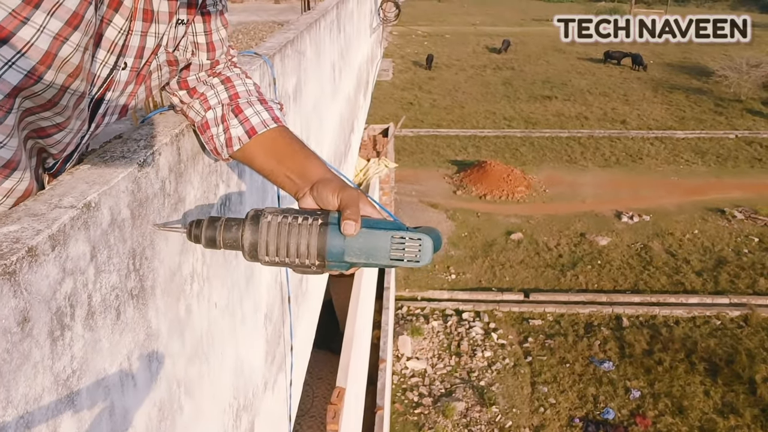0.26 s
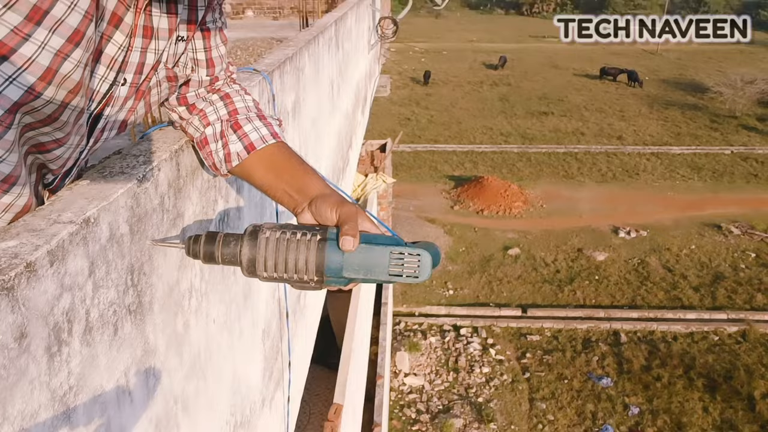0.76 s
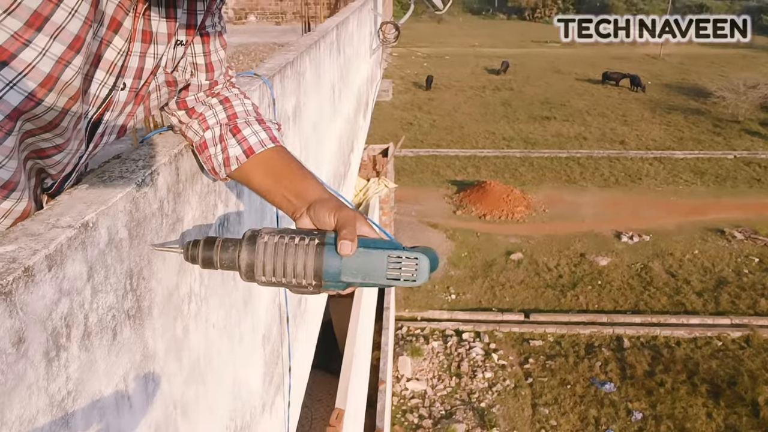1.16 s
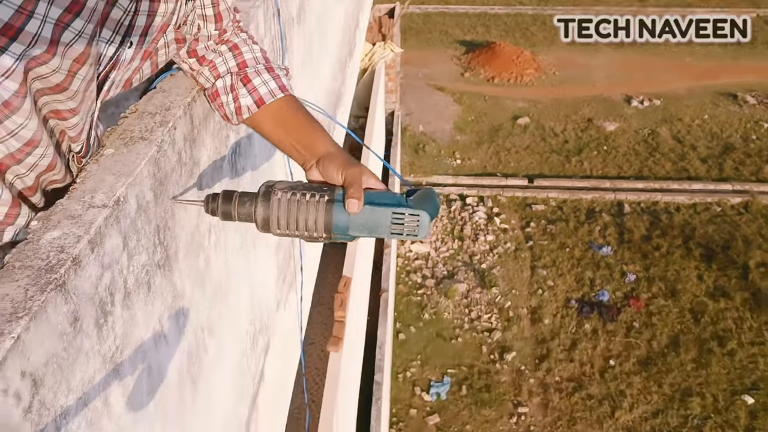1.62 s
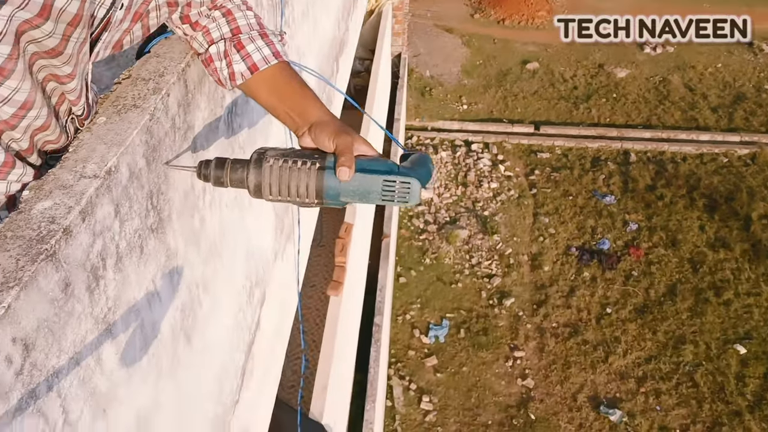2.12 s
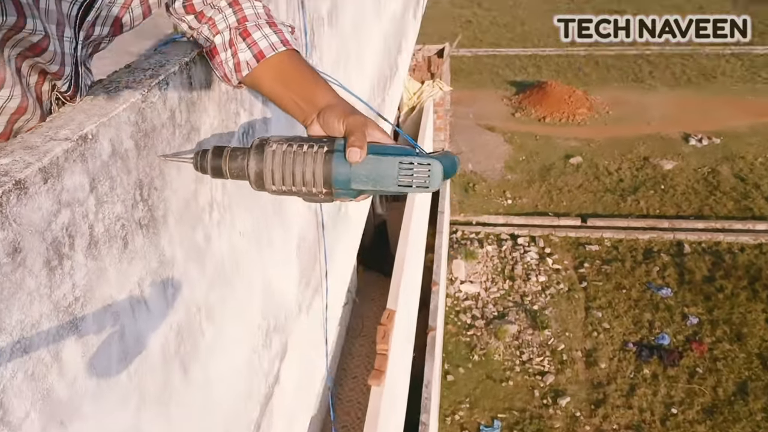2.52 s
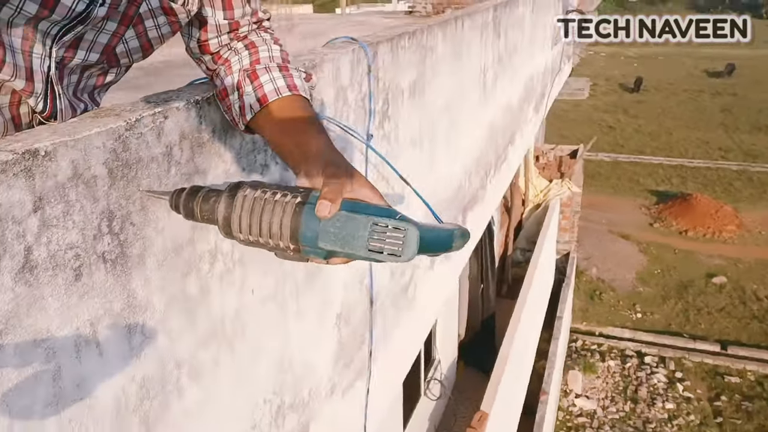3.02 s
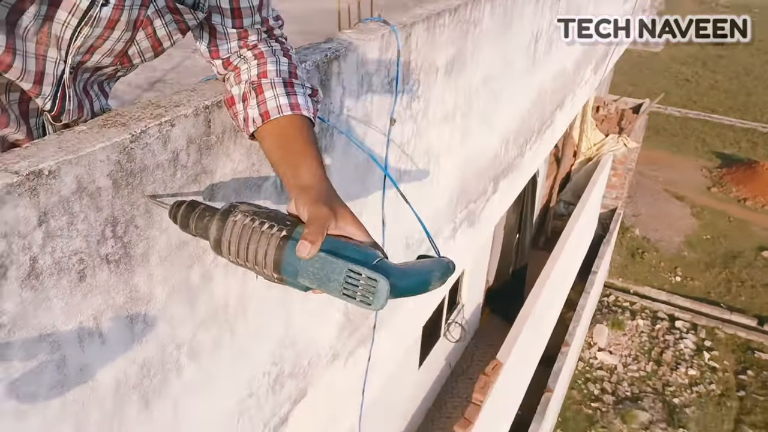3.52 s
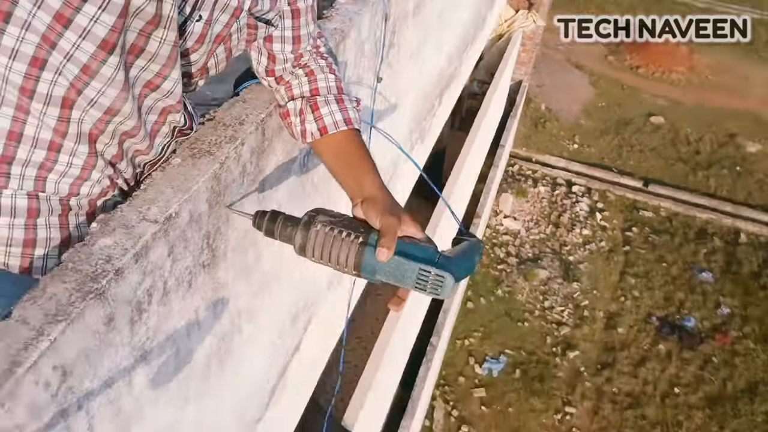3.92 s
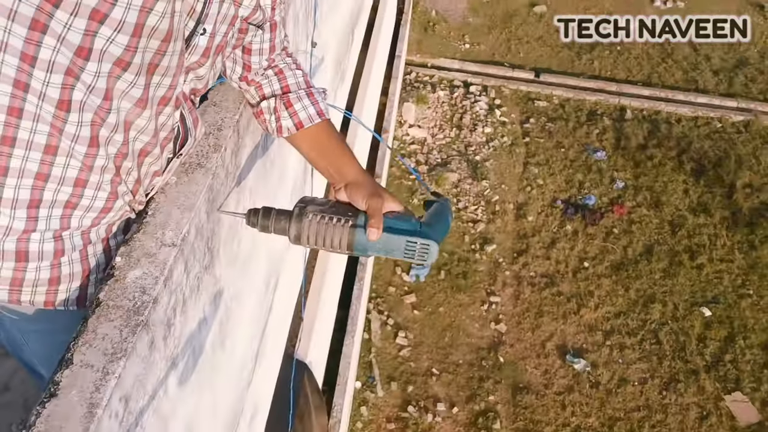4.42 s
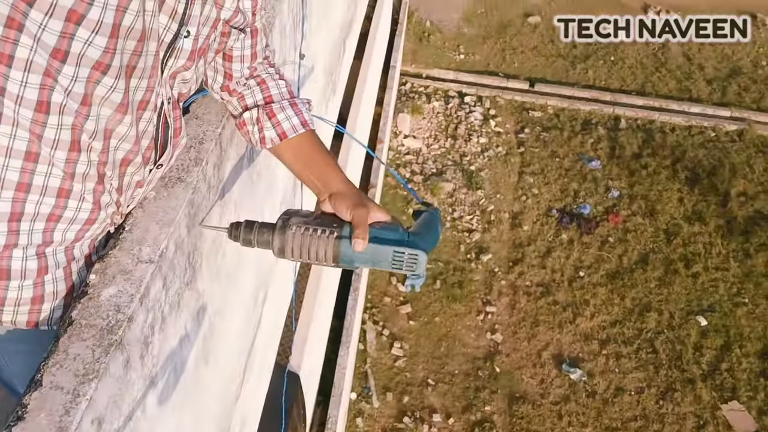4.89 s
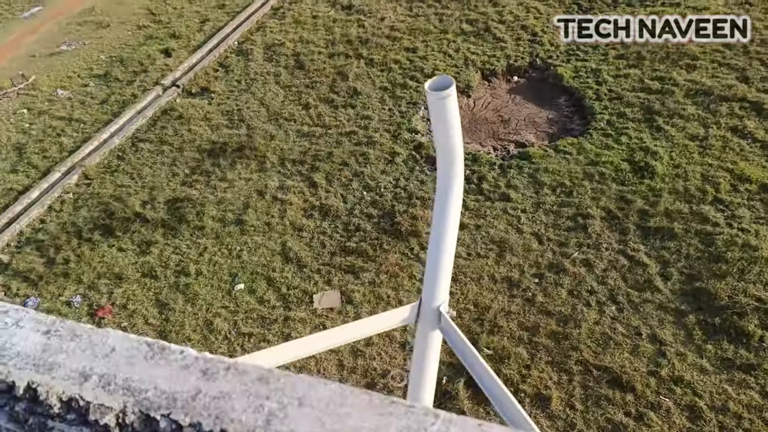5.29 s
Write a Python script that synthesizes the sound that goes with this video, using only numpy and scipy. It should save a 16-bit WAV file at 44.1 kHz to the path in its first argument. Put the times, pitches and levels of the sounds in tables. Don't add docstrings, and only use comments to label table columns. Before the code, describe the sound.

Rapid metallic hammering from a power drill drops from quick to laboured pace outdoors, then stops dead, leaving faint wind and small handling clicks.

```python
import sys
import numpy as np
from scipy import signal
from scipy.fft import rfft, irfft
from scipy.io import wavfile
from scipy.ndimage import uniform_filter1d

SR = 44100
rng = np.random.default_rng(int(sys.argv[2]) if len(sys.argv) > 2 else 0)


def volts(x):
    e = np.asarray(x, float) / 20
    return 10 ** e


def int16_out(signal):
    q = np.round(np.clip(np.atleast_2d(signal).T, -1, 1) * 32767)
    wavfile.write(sys.argv[1], SR, q.astype(np.int16))


N = 244755
TIME = np.arange(N) / SR

# start in seconds, level in dB.
AIR_LEVEL = [
    (5.315, -85),
    (5.335, -56),
    (5.4, -47.5),
    (5.47, -41.5),
    (5.55, -40),
]
# frequency in Hz, density in dB per Hz.
AIR_COLOUR = [(180, -35), (300, -16), (593, -30), (701, -17), (961, -41.5), (1040, -35.5), (3520, -42.5),
              (5080, -50.5), (10300, -55), (11500, -85)]
# start in seconds, left dB, right dB, fall in ms.
CASE_TICKS = [
    (5.376, -40, -40, 2.1),
    (5.481, -34, -32, 1.4),
    (5.4968, -16, -45, 0.27),
    (5.5022, -42, -8.5, .3),
    (5.549, -38, -25, 0.35),
]

# frequency in Hz, density in dB per Hz.
WIND_COLOUR = [(15, -6.5), (40, -3.5), (80, -4), (118, 1.5), (170, -6), (300, -19), (600, -36), (1500, -58),
               (4000, -76)]
# peak time in seconds, peak level in dB, seconds to fall 10 dB.
LEFT_GUSTS = [(0, -30, .3), (.62, -30.5, .12), (.78, -28, .06), (.94, -24, .05), (1.04, -25, .03),
              (1.14, -28, .05), (2.12, -32, .1), (2.25, -27, .05), (2.48, -29.5, .08), (2.63, -29, .12),
              (3.01, -30, .12), (3.12, -25, .12), (3.51, -18, .08), (3.64, -24, .08), (3.85, -27, .1),
              (4.05, -27, .2), (4.23, -28, .12), (4.4, -28, .1), (4.55, -33, .1), (4.69, -29, .08),
              (5.0, -35, .2)]
# peak time in seconds, peak level in dB, seconds to fall 10 dB.
RIGHT_GUSTS = [(0, -28, .4), (.62, -28, .25), (.88, -24.5, .08), (.99, -25, .07), (1.12, -24, .08),
               (1.285, -19, .07), (1.79, -27, .11), (2.04, -30, .12), (2.19, -24, .1), (2.31, -17, .1),
               (2.46, -19, .12), (2.64, -16.5, .16), (2.78, -19, .12), (2.87, -15.5, .1), (3.05, -19.5, .1),
               (3.35, -15.5, .14), (3.57, -19, .07), (3.64, -14.5, .03), (3.75, -24, .03),
               (3.97, -16.5, .06), (4.08, -21, .1), (4.19, -14.5, .07), (4.31, -17, .06), (4.48, -28, .15),
               (4.62, -28, .15), (4.76, -31, .15), (4.96, -27, .09), (5.15, -31, .1)]
# peak time in seconds, peak level in dB, seconds to fall 10 dB.
LATE_GUSTS = [
    [(5.335, -32, .012), (5.417, -28, .014), (5.49, -25, .015), (5.53, -28, .03)],
    [(5.488, -20, .015), (5.512, -21, .02), (5.545, -20, .02)],
]
# start in seconds, left peak, right peak (full scale 1), length in ms.
PORT_POPS = [(.008, -0.26, 0.03, 20), (0.033, -0.048, -.3, 28), (.175, 0.24, .15, 23),
             (0.198, -0.23, 0.19, 18), (0.222, 0.075, -.1, 18), (0.348, .35, -0.039, 27),
             (.547, -0.3, .35, 30), (.573, 0.67, -0.47, 39), (0.804, 0, -.32, 35),
             (1.119, -0.54, 0.035, 19), (1.347, 0.16, 0.068, 15), (2.941, 0.087, 0.49, 20),
             (3.042, 0, -0.56, 30), (3.107, -0.027, 0.6, 28), (3.74, -0.036, -0.43, 28),
             (3.807, 0.049, 0.56, 22)]
# centre in seconds, left peak, right peak (full scale 1), pitch in Hz, length in ms.
PORT_BUFFETS = [(5.334, .06, 0, 165, 5), (5.337, .02, 0, 400, 4), (5.359, .018, 0, 300, 5),
                (5.38, .025, .008, 170, 9), (5.412, -.12, 0, 135, 8), (5.426, .17, 0, 170, 4),
                (5.447, .025, .008, 350, 8), (5.488, .05, .16, 150, 6), (5.509, 0, .19, 125, 7),
                (5.527, .04, .12, 100, 8), (5.5435, .02, .36, 75, 6)]

# time in seconds, piston turns per second.
SPEED = [(0.0, 42.667), (0.35, 40.089), (0.6, 39.03), (1.08, 37.898), (1.25, 35.186), (1.4, 33.157),
         (1.6, 31.812), (1.78, 30.795), (2.0, 30.371), (2.4, 30.189), (2.78, 29.871), (3.1, 29.829),
         (3.4, 29.977), (3.6, 30.265), (3.8, 30.267), (4.0, 30.394), (4.4, 30.534), (5.55, 30.843)]
# time in seconds, nearness in dB, vents facing the phone in dB, chuck ring in dB.
STANCE = [(0, 1.5, -.5, 0), (.3, 0, .5, 0), (.55, -.3, .5, -.5), (.8, .5, 0, .5), (1.06, .7, 0, .5),
          (1.39, -2, .5, -1), (1.61, -3.5, .5, -.5), (2.2, -2.5, .5, 1.5), (2.78, 0, 0, .5),
          (3.05, -1, 0.5, 0), (3.4, -.5, 3.5, -1.5), (3.75, -1, 2.5, -1.5), (3.96, -2.5, 1.5, 4),
          (4.3, -3, .5, 4.2), (4.69, -2, 1, 4.5), (5.22, -1.5, 1.2, 4)]
# time in seconds, lag in samples.
PORT_LAG = [
    (0, 8),
    (1.5, 6),
    (3, 1),
    (5.3, 2),
]
# frequency in Hz, left minus right in dB.
PORT_DIFFERENCE = [(300, 0.5), (800, 0), (1300, -6), (2300, -17), (3500, 0), (4400, -0.5), (5900, -9),
                   (7200, -15), (8600, 14), (11000, 3.5), (13000, 0.5), (15500, -3.5)]
# frequency in Hz, density in dB per Hz.
DRILL_COLOUR = [(120, -29.5), (200, -8.5), (320, -13.5), (600, -12.5), (930, -9.5), (1700, -4), (2500, 0.5),
                (3200, -3), (3700, -8), (6500, -6.5), (7400, -7.5), (8800, -19), (13300, -17), (15600, -16)]
# frequency in Hz, width in Hz, height in dB.
DRILL_RINGS = [(246.4, 25, 3.5), (433, 150, 7.5), (725, 70, 7.5), (1265, 60, 2.5), (1680, 200, 2),
               (2605, 330, 1.5), (2880, 130, 4), (3080, 160, 5), (3890, 310, -1), (13150, 760, 2)]
# frequency in Hz, width in Hz, dB per dB of chuck ring.
LEANING = [
    (2480, 420, 1.3),
    (3000, 600, -1.5),
    (1280, 140, 1.2),
    (1700, 250, -.3),
]

# low Hz, high Hz, grind between knocks in dB, repeat per turn (0-1),
# scatter in dB, share common to both ports (0-1), trim in dB.
LAYERS = [
    (91.5, 890, -12, .72, 1.5, .84, -1.3),
    (876, 1367, -11.5, 0.6, 2, 0.5, -5.5),
    (1410, 3900, -9, 0.6, .6, 0.4, -1.6),
    (3318, 6320, -5, 0.3, 1.0, 0.36, 0.4),
    (8000, 11240, -9.5, 0.1, 2, 0.05, -3),
    (11330, 15000, -18.5, 0.3, 2.4, 0.28, -2),
]
LAYER_PART = (0, 0, 1, 2, 3, 3)
# level in dB, then dB per dB of nearness, of facing and of chuck ring.
PARTS = [
    (-31.3, .9, -.1, -.05),
    (-25.5, .6, -.4, .3),
    (-28, .8, 1.05, -.05),
    (-34.7, 1.3, .2, -.05),
]
# share of the turn, rise in ms, fall in ms, wall dB, chuck dB, gears dB, bit dB.
KNOCKS = [
    (0.0, 1.15, .7, -5, -10, -2.5, -6.5),
    (.032, 0.95, 1.4, -6, -9, 1.5, 2),
    (.29, 2.1, 2.4, -1, -6.5, 1, -13),
    (.45, 0.32, 0.68, -8.5, -14, -8, -22),
    (.6, 1.5, 1.0, -18, -10, -7.5, -18.5),
    (.76, 1.6, 1.3, -11, -1.5, -7, -18),
    (.86, 0.5, 0.4, -12, -4, 1.5, -18),
]
# wall dB, chuck dB, gears dB, bit dB.
LOADED_KNOCKS = [(-2, -1.5, -.5, .1), (-2, -1.5, .1, .1), (-.6, .1, .6, 5), (.1, .1, .1, .1),
                 (.1, .1, .1, 3), (-.6, -4, .1, 3), (.1, -.5, -4, .1)]
LOADED_SHIFT = (0, -.043, -.06, -.03, -.035, 0.01, -.165)
LOADED_GRIND_DB = (.1, .1, .1, .1, 2.2, 2.2)
GRIND_SWAY_DB = (.1, .1, .1, .1, 1.2, 2.2)
# time in seconds, lower bit dB, upper bit dB.
STRIKES = [(0.009, 6, 0), (0.176, 4, -4), (0.273, 4, -4), (0.398, 5, 2), (0.652, -1, -7), (0.729, 1, 8),
           (0.755, 7, 0), (0.833, 5, -1), (0.859, -3, 6), (0.937, 1, 6), (0.963, 0, 4), (0.989, 7, 2),
           (1.121, 8, 0), (1.148, 2, 4), (1.203, 2, 4), (1.26, -4, -7), (1.318, -6, -6), (1.347, 2, 5),
           (1.377, 0, 6), (1.498, 2, 9), (1.56, -1, -8), (1.654, 1, 6), (1.783, 5, 1), (1.848, -8, -4),
           (1.881, -2, -8), (1.946, 2, 8), (2.111, 4, 1), (2.177, 4, 4), (2.243, 2, 5), (2.441, 0, 9),
           (2.475, 5, -1), (2.574, 1, 7), (2.708, 7, 4), (2.741, 2, 6), (2.875, 3, 7), (2.942, -7, -2),
           (2.975, -4, -6), (3.043, 6, -5), (3.11, 4, -3), (3.177, 11, 4), (3.21, -5, 5), (3.344, 6, -4),
           (3.41, -6, -6), (3.477, -4, 8), (3.543, 0, 4), (3.577, 9, 10), (3.61, 4, -1), (3.808, 7, 5),
           (3.874, -3, 6), (3.907, 5, 10), (4.006, 5, 5), (4.17, -4, -6), (4.203, -5, -6), (4.236, -6, -10),
           (4.334, 2, 4), (4.367, 0, 7), (4.563, -8, -14), (4.596, 5, 5), (4.629, -5, 8), (5.053, 4, 8)]
STRIKE_REACH = (0, 0, .05, .25, 1.25, 1.25)
# time in seconds, barrel Hz, barrel length in ms, barrel dB,
# chuck dB, casing dB, return stroke dB.
BLOWS = [
    (0, 1900, .65, -8.5, -10, -10, -27),
    (1.1, 1900, .65, -8.5, -10.5, -10.5, -25),
    (1.4, 1900, .6, -9, -14, -11, -20),
    (1.65, 2100, .8, -10.5, -24, -11.5, -17),
    (2.2, 2100, .8, -10, -24, -11.5, -16.5),
    (2.45, 1850, .8, -12.5, -26, -16, -16),
    (3.0, 1850, .8, -13, -26, -17, -16),
    (3.25, 2000, .8, -13.5, -30, -17, -19),
    (3.8, 2000, .8, -13.5, -30, -17, -18),
    (3.95, 2230, 1.0, -10.5, -30, -27, -15.5),
    (5.25, 2230, 1.0, -12, -30, -26, -15),
]
# share of the turn, delay free in ms, delay loaded in ms, length in ms (0: barrel's own).
BLOW_TIMES = [
    (0, -.3, -.5, .9),
    (0, -.3, -.55, 0),
    (0, -.3, -.1, .6),
    (0, .43, .05, 1.0),
    (.25, 0, 0, 1.3),
    (.745, 0, 0, 1.7),
]

LOADED_TURNS_PER_S, FREE_TURNS_PER_S = 30, 39


def unit(x):
    return x / np.sqrt(np.mean(x ** 2, axis=-1, keepdims=True))


def curves(table, outside_db=None):
    s, *columns = np.transpose(table)
    return np.array([np.interp(TIME, s, c, outside_db, outside_db) for c in columns])


def spectrum_at(hz, points):
    corner_hz, corner_db = np.transpose(points)
    return np.interp(np.log(hz), np.log(corner_hz), corner_db)


def shape(points, rings=()):
    hz = np.arange(4097) * SR / 8192 + 1
    bells_db = sum(db / (1 + (2 * (hz - ring_hz) / width_hz) ** 2) for ring_hz, width_hz, db in rings)
    return np.atleast_2d(spectrum_at(hz, points) + bells_db)


def colour(x, db):
    fold = np.r_[1, 2 * np.ones(4095), np.zeros(4096)]
    cepstrum = irfft(db * np.log(10) / 20)
    response = irfft(np.exp(rfft(fold * cepstrum)))
    return signal.fftconvolve(x, response, axes=-1)[:, :N]


def filtered(x, order, hz, kind):
    return signal.sosfilt(signal.butter(order, hz, kind, fs=SR, output="sos"), x)


def walk(rate, count):
    k = int(SR / rate)
    held = np.repeat(rng.standard_normal((count, N // 200)), k, axis=1)[:, :N]
    return 1.4 * uniform_filter1d(uniform_filter1d(held, k), k)


def open_air():
    mid, side = unit(colour(rng.standard_normal((2, N)), shape(AIR_COLOUR)))
    out = volts(curves(AIR_LEVEL, outside_db=-120)) * np.array([mid + 0.63 * side, mid - .8 * side])
    rustle = filtered(rng.standard_normal((2, N)), 2, [300, 5000], "band")
    for s, left_db, right_db, fall_ms in CASE_TICKS:
        ms = (TIME - s) * 1000
        brush = .4 * rustle * (ms > 0) * np.exp(-np.abs(ms) / fall_ms)
        snap = np.exp(-(ms / 0.07) ** 2)
        out += volts([[left_db], [right_db]]) * (brush - snap)
    return out


def gusts(ports, breeze_db):
    gust_db = []
    for rows in ports:
        each_db = [peak_db - 10 * np.abs(TIME - s) / fall_s for s, peak_db, fall_s in rows]
        gust_db.append(np.max(each_db, axis=0))
    return np.hypot(volts(breeze_db), volts(gust_db))


def wind(level, flutter_db=1.5):
    rumble = unit(colour(rng.standard_normal((2, N)), shape(WIND_COLOUR)))
    return rumble * level * volts(flutter_db * walk(30, count=2))


def late_wind():
    breeze_db = curves(AIR_LEVEL, outside_db=-120)[0] + 0.1
    opening = np.clip((TIME - AIR_LEVEL[0][0]) / .015, 0, 1)
    level = gusts(LATE_GUSTS, breeze_db) * opening
    return filtered(wind(level, flutter_db=1.0), 2, 70, "high")


def buffets():
    out = np.zeros((2, N))
    for s, left, right, hz, length_ms in PORT_BUFFETS:
        puff = np.exp(-((TIME - s) * 1000 / length_ms) ** 2)
        out += np.outer([left, right], puff * np.cos(2 * np.pi * hz * (TIME - s)))
    return out


def pops():
    out = np.zeros((2, N))
    for s, left, right, length_ms in PORT_POPS:
        x = np.clip(TIME - s, 0, None) * 1000 / (0.59 * length_ms)
        out += np.outer([left, right], (x > 0) * np.cos(2 * np.pi * x ** 0.7) * np.exp(-1.3 * x))
    return filtered(1.18 * out, 2, 750, "low")


def piston():
    rate = curves(SPEED)[0]
    lead = .1
    done = .636 + np.cumsum(rate) / SR + lead
    return done.astype(int), (done % 1 - lead) / rate * 1000, rate


def stance(rate):
    near_db, facing_db, ring_db = curves(STANCE)
    free = rate - LOADED_TURNS_PER_S
    parts_db = [db + a * near_db + b * facing_db + c * ring_db for db, a, b, c in PARTS]
    parts_db[1] = parts_db[1] + .1 * free
    pan_db = -.8 + 3 * np.exp(-((TIME - 3.08) / .2) ** 2)
    rebound_db = -.5 + .15 * ring_db - .1 * free
    return parts_db, pan_db, rebound_db, ring_db


def strikes(turn):
    s, lower_db, upper_db = np.transpose(STRIKES)
    listed = turn[(s * SR).astype(int)]
    body_db = [lower_db + upper_db] * 3
    layers_db = np.column_stack(body_db + [np.maximum(lower_db, upper_db), lower_db, upper_db])
    db = np.zeros((200, len(LAYERS)))
    db[listed] = layers_db * STRIKE_REACH
    return listed, db


def clatter(turn, since, repeat):
    repeat = np.clip(repeat, 0, .99)
    fresh = rng.standard_normal((220, 1600))
    rows = signal.lfilter([np.sqrt(1 - repeat ** 2)], [1, -repeat], fresh, axis=0)
    return rows[turn + 20, since]


def knocks(j, turn, ms, rate, load, rebound_db, chance, strike_db):
    part, scatter_db = LAYER_PART[j], LAYERS[j][4]
    gate = 0
    for k, (share, rise_ms, fall_ms, *knock_db) in enumerate(KNOCKS):
        is_blow = k < 2
        late = ms - (share + LOADED_SHIFT[k] * load) * 1000 / rate
        late = late + 1.1 * (j == 1)
        late = late - (.1 + .25 * share) * chance[turn, k, 7]
        late = late / (1 + .4 * load * (k == 1))
        scatter = scatter_db * (0.83 * chance[turn, k, 8] + 0.72 * chance[turn, k, j])
        size_db = knock_db[part] + LOADED_KNOCKS[k][part] * load
        if is_blow:
            size_db = size_db + scatter + strike_db[turn, j] - 2 * load * (part == 3)
        else:
            size_db = size_db + scatter / 2 + rebound_db
        rise, fall = np.exp(-(late / rise_ms) ** 2), np.exp(-np.abs(late) / fall_ms)
        gate = gate + volts(size_db) * np.where(late < 0, rise, fall)
    return gate


def blows(ms, rate, load, ring_db, pan_db, chance):
    barrel_hz, barrel_ms, barrel_db, chuck_db, casing_db, return_db = curves(BLOWS)
    notes = [(1220, -25), (barrel_hz, barrel_db), (2600, chuck_db), (2960, casing_db),
             (2530, -31 + 2.2 * ring_db), (2530, return_db)]
    out = 0
    for k, ((hz, db), (share, free_ms, loaded_ms, length_ms)) in enumerate(zip(notes, BLOW_TIMES)):
        jitter_ms = .08 * (1 + 4 * share) * chance[:, max(k - 3, 0), 7]
        late = ms - share * 1000 / rate - jitter_ms
        late = late - free_ms - (loaded_ms - free_ms) * load
        scatter_db = 1.3 * chance[:, 2 + k % 5, 6]
        size = volts(db + scatter_db) * np.exp(-(late / (length_ms or barrel_ms)) ** 2)
        pitch_hz = hz * (1 + .02 * chance[:, k, 3])
        note = size * np.sin(2 * np.pi * pitch_hz * late / 1000)
        left_db = spectrum_at(hz, PORT_DIFFERENCE) + pan_db
        out = out + np.array([volts(left_db) * note, note])
    return out


def drill():
    turn, ms, rate = piston()
    since = np.clip((ms + 4) * SR / 1000, 0, 1599).astype(int)
    parts_db, pan_db, rebound_db, ring_db = stance(rate)
    chance = rng.standard_normal((200, len(KNOCKS), 9))
    listed, strike_db = strikes(turn)
    chance[listed, :2] *= [1, 1, 1, 1, 0, 0, 1, 1, 0]
    ports_db = shape(DRILL_COLOUR, DRILL_RINGS) + shape(PORT_DIFFERENCE) * np.array([[.5], [-.5]])
    lagged = np.clip(np.arange(N) - curves(PORT_LAG)[0], 0, None).astype(int)
    sway = walk(25, count=1)[0]
    load = np.clip((FREE_TURNS_PER_S - rate) / (FREE_TURNS_PER_S - LOADED_TURNS_PER_S), 0, 1)
    left, right = blows(ms, rate, load, ring_db, pan_db, chance[turn])
    out = np.array([left[lagged], right])
    for j, (low_hz, high_hz, grind_db, repeat, _, shared, trim_db) in enumerate(LAYERS):
        grind_db = grind_db + LOADED_GRIND_DB[j] * load + 2.0 * walk(60, count=1)[0] + GRIND_SWAY_DB[j] * sway
        gate = volts(grind_db) + knocks(j, turn, ms, rate, load, rebound_db, chance, strike_db)
        right, own = (gate * clatter(turn, since, repeat) for _ in range(2))
        left = shared * right[lagged] + np.sqrt(1 - shared ** 2) * own
        pair = colour(filtered(np.array([left, right]), 3, [low_hz, high_hz], "band"), ports_db)
        if j in (1, 2):
            for hz, width_hz, per_db in LEANING:
                ring = signal.lfilter(*signal.iirpeak(hz, hz / width_hz, fs=SR), pair)
                pair = pair + (volts(per_db * ring_db) - 1) * ring
        pair = pair * volts([pan_db / 2, -pan_db / 2])
        envelope = np.sqrt(uniform_filter1d(pair.mean(axis=0) ** 2, SR // 3) + 1e-9)
        free_top_db = 2.5 * (1 - load) * (j == 5)
        out = out + pair * volts(parts_db[LAYER_PART[j]] + trim_db + free_top_db) / envelope
    return out


def scene():
    fade = np.clip(1 - (TIME - 5.221) * 1000 / 11.0, 0, 1) ** 1.8
    drilling = drill() + wind(gusts([LEFT_GUSTS, RIGHT_GUSTS], breeze_db=-40)) + pops()
    return fade * drilling + late_wind() + buffets() + open_air()


def band_limit(x):
    return signal.sosfilt(signal.butter(12, 16500, fs=SR, output="sos"), x)


def record(dry):
    top_cut = signal.ellip(8, .3, 50, 15900, fs=SR, output="sos")
    dull = signal.sosfilt(top_cut, np.clip(dry, -1, 1))
    return band_limit(np.clip(dull, -1, 1))


dry = scene()
out = record(dry)
int16_out(out)
```